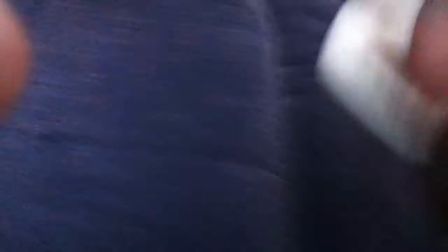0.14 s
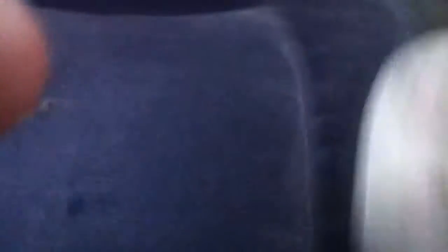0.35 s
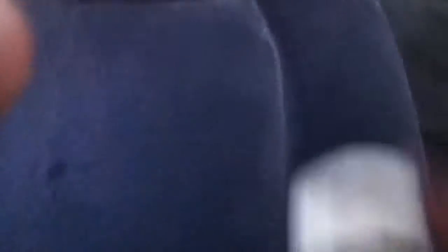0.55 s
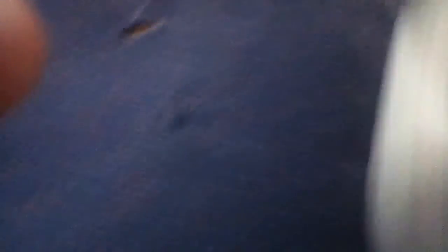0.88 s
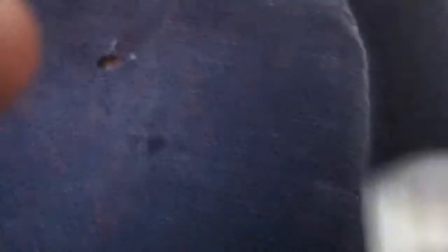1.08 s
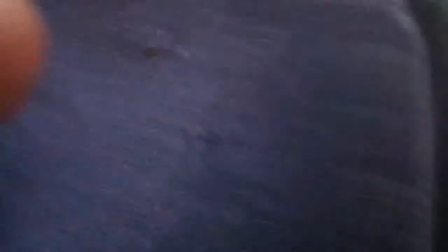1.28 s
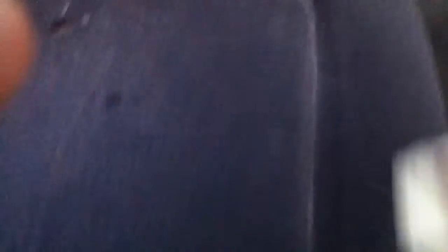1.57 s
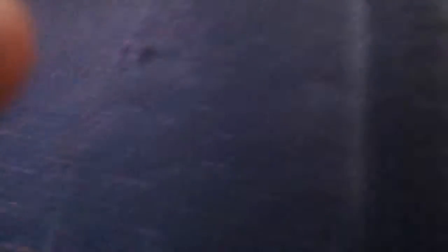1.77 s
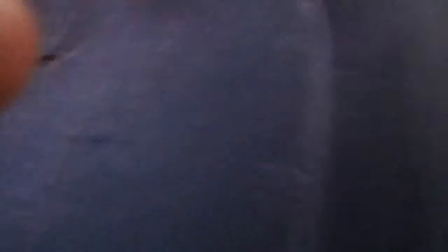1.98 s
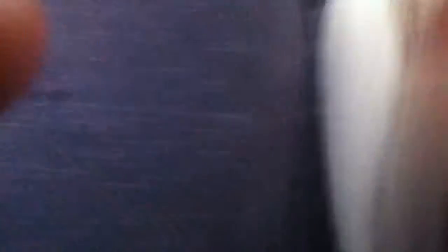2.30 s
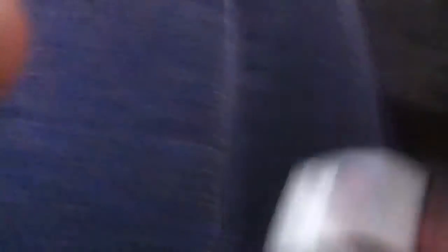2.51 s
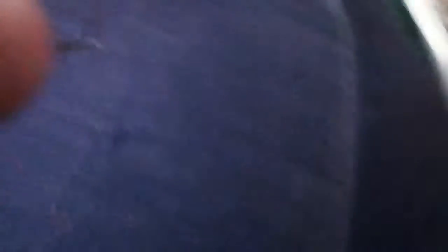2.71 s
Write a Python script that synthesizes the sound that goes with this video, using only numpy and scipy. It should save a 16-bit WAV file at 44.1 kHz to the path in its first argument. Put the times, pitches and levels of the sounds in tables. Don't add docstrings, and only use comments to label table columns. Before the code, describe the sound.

Rapid rhythmic scrubbing on a fabric seat, grainy and hissy with soft foam thumps, interrupted by two hard clicks; heard very close and dry, the level dipping after the first click, inside a quiet car.

```python
import sys
import numpy as np
from scipy import signal
from scipy.fft import rfft, irfft, next_fast_len
from scipy.io import wavfile
from scipy.ndimage import uniform_filter1d, map_coordinates

SR = 44100
rng = np.random.default_rng(int(sys.argv[2]) if len(sys.argv) > 2 else 0)


def volts_from_db(level):
    exponent = np.asarray(level, float) / 20
    return 10 ** exponent


def wrap_up_sound(samples):
    columns = np.atleast_2d(samples).T
    tamed = np.clip(columns, -1, 1)
    steps = np.round(tamed * 32767).astype(np.int16)
    wavfile.write(sys.argv[1], SR, steps)


N = 125685

# (start [s], length [s], rub level [dB], top weave pitch [Hz], hiss over the rub [dB])
STROKES = [(-.19, 0.23, -41, 1900, -13.5), (0.07, 0.25, -37, 2150, -15), (.365, 0.23, -41, 1797, -17.5),
           (0.615, 0.25, -37.5, 2094, -14), (0.891, 0.25, -39, 2140, -16.5),
           (1.151, .207, -36.5, 2145, -15), (1.41, .2, -41.5, 1900, -16.5),
           (1.641, 0.22, -37.5, 2158, -14.5), (1.895, .197, -39, 1990, -17.5),
           (2.125, 0.2, -37, 2137, -12.5), (2.367, 0.18, -36, 2350, -14), (2.571, 0.22, -36.5, 2290, -13),
           (2.823, 0.19, -40.5, 2000, -13)]
STROKE_LEAN = [3.5, 1, 3.5, 2.2, 5.5, 3, -1, 2.8, -6, 0.5, -0.5, 1, 4]
STROKE_SING = [-3, 0, -3, 0, -2, -.5, -5, -3, -5, 1, 0, 1.5, -3]
# (time [s], level [dB], half length [s])
DRAGS = [
    (0.349, -62, 0.04),
    (0.608, -70, .02),
    (1.385, -65, .03),
    (1.625, -52, .03),
    (2.125, -52.5, 0.028),
    (2.564, -48, 0.026),
]
# (multiple of the thread rate [1], level [dB], fuzz [Hz])
WEAVE_PARTIALS = [(.49, -3, 80), (.72, -9, 110), (1, .5, 85)]
# (frequency [Hz], level [dB])
WEAVE_COLOUR = [(300, -30), (600, -9), (900, -2), (2200, 0), (2700, -6)]
# (frequency [Hz], level [dB per Hz])
RUB_COLOUR = [(250, -29), (400, -5.5), (560, -8.5), (800, -5), (1700, -3.5), (2550, -10), (3000, -27),
              (5000, -44.5)]
FOAM_COLOUR = [(25, -56), (60, -29), (130, -14), (200, -3.5), (320, -7.5), (500, -22.5), (700, -48),
               (1100, -94)]
FIBRE_COLOUR = [(4500, -28), (6300, -10.5), (8000, -7.5), (9500, 0.5), (11500, -3.5), (13500, -5.5),
                (15600, -7)]
NAP_COLOUR = [(1800, -33), (2700, -4.5), (3300, -1), (4100, -7.5), (4600, -7.5), (5300, -9), (6300, -20.5),
              (8000, -46)]
CABIN_COLOUR = [(25, -53), (70, -13), (230, 6), (500, -8.5), (1000, -6), (2030, -14.5), (3200, -25.5),
                (15800, -30.5)]
# (frequency [Hz], width [Hz], lift [dB])
PAD_BODY = [(237, 38, 2.5), (725, 174, 6), (854, 124, 6), (985, 45, 9), (1432, 134, 3.5), (2540, 110, 2.5)]
# (time [s], peak level [dB], polarity and size of the blow [1], blow after the tick [ms])
SNAPS = [
    (1.4291, -2.5, 0.94, 0.17),
    (1.9339, -1.5, -1.46, 0.09),
]
# (frequency [Hz], level [dB], t60 [s])
TICK_MODES = [
    [(5730, -4.5, 0.0017), (6800, -4, .0014), (10800, -15.5, .0012)],
    [(4900, 0.5, 0.0011), (7700, -1.5, 0.00099), (9850, -9.5, 0.0013)],
]
# (frequency [Hz], level [dB], t60 [s])
BLOW_MODES = [
    [(367, -18.5, 0.046), (884, -20, 0.045), (1130, -0.5, 0.0077), (1900, -3.5, 0.0048),
     (2760, -7.5, 0.0045), (3700, -32, 0.001)],
    [(230, -29, 0.038), (480, -28.5, .02), (900, -5.5, 0.0059), (2350, -1, 0.0045), (3150, -1, 0.0023)],
]
# (time [s], peak level [dB], frequency [Hz])
KNOCKS = [
    (0.3681, -32.5, 790),
    (1.532, -23.5, 896),
]
DUCKS = [
    -8,
    -2.5,
]
# (frequency [Hz], width [Hz], level [dB])
PORT_DIPS = [(4470, 153, -5), (6370, 280, -6)]

PUSH_LEAN, PULL_LEAN = 1.1, .93
GRIP_SPEED = 0.23
RUB_GROWS, THUMP_GROWS, HISS_GROWS, WEAVE_GROWS = 0.57, 0.28, 0.81, 0.54
THUMP_DB, WEAVE_DB, NAP_DB = -13, -6.5, -18
WEAVE_TILT_DB, HISS_TILT_DB, NAP_TILT_DB = 3, 0.5, 10.5
SNAP_ATTACK_S, KNOCK_T60_S = .00006, 0.013
EDGE_LOW_HZ, EDGE_TOP_HZ = 180, 13600
SEAT_T60_S, SEAT_DB, CABIN_DB = 0.042, -22, -53
MIC_TOP_HZ, RECOVER_S = 15600, 1.8


def unit(x):
    return x / np.sqrt(np.mean(np.abs(x) ** 2) + 1e-20)


def wobble(rate):
    knots = rng.standard_normal(int(N * rate / SR) + 4)
    return map_coordinates(knots, [np.arange(N) * rate / SR])


def resonances(f, peaks):
    return sum(db / (1 + (2 * (f - centre) / width) ** 2) for centre, width, db in peaks)


def coloured(x, points, lifts=()):
    size = next_fast_len(N + 8192)
    f = np.fft.rfftfreq(size, 1 / SR)
    hz, level_db = np.transpose(points)
    curve_db = np.interp(np.log(f + 1), np.log(hz + 1), level_db) + resonances(f, lifts)
    return unit(irfft(rfft(x, size) * volts_from_db(curve_db), size)[:N])


def grit(spread_db, patchy_db):
    slips = rng.standard_normal(N) * volts_from_db(spread_db * rng.standard_normal(N))
    grid = signal.stft(slips, nperseg=512)[2]
    patches = uniform_filter1d(rng.standard_normal(grid.shape), size=2, axis=0)
    patches = uniform_filter1d(patches, size=6, axis=1)
    return signal.istft(grid * volts_from_db(patchy_db * unit(patches)), nperseg=512)[1][:N]


def scrubbing():
    speed, near, rub_db, top_hz, hiss_db, lean_db, sing_db = motion()
    slide = np.tanh((speed / GRIP_SPEED) ** 2)
    press_db = 1.5 * wobble(14) + 1.35 * wobble(44.85)
    cloth = coloured(grit(spread_db=4.5, patchy_db=2.5), RUB_COLOUR, PAD_BODY)
    fibres = coloured(grit(spread_db=2.5, patchy_db=2.0), FIBRE_COLOUR)
    nap = coloured(grit(spread_db=0.0, patchy_db=2.0), NAP_COLOUR)
    thump = foam_thump(speed, lean_db)
    threads_db = WEAVE_DB + sing_db + WEAVE_TILT_DB * near
    threads = volts_from_db(threads_db) * speed ** WEAVE_GROWS * weave(top_hz * speed)
    fibres_db = hiss_db + HISS_TILT_DB * near + 0.44 * wobble(29.8)
    nap_db = NAP_DB + NAP_TILT_DB * near + 1.24 * wobble(14)
    fine = volts_from_db(fibres_db) * fibres + volts_from_db(nap_db) * nap
    stroke = speed ** RUB_GROWS * cloth + thump + speed ** HISS_GROWS * fine + threads
    dragged = cloth + volts_from_db(-10) * fibres + volts_from_db(-15.5) * nap
    return volts_from_db(rub_db + press_db) * slide * stroke + turn_drag() * dragged


def motion():
    t, table = np.arange(N) / SR, np.array(STROKES)
    k = np.clip(np.searchsorted(table[:, 0], t) - 1, 0, None)
    start, length, rub_db, top_hz, hiss_db = table[k].T
    push = k % 2 == 1
    travel = np.clip((t - start) / length, 0, 1) ** np.where(push, PUSH_LEAN, PULL_LEAN)
    speed = np.abs(np.sin(np.pi * travel))
    near = np.where(push, .5 - travel, travel - .5)
    return speed, near, rub_db, top_hz, hiss_db, np.array(STROKE_LEAN)[k], np.array(STROKE_SING)[k]


def weave(thread_hz):
    turns = np.cumsum(thread_hz * (1 + .02 * wobble(30))) / SR
    song = 0
    for multiple, db, fuzz_hz in WEAVE_PARTIALS:
        phase = 2 * np.pi * multiple * turns
        fuzzy = wobble(fuzz_hz) * np.cos(phase) + wobble(fuzz_hz) * np.sin(phase)
        song = song + volts_from_db(db + 2.6 * wobble(40)) * fuzzy
    return coloured(song, WEAVE_COLOUR, PAD_BODY)


def foam_thump(speed, lean_db):
    lumps_db = 2.5 * wobble(35)
    foam = coloured(grit(spread_db=3, patchy_db=-0.5), FOAM_COLOUR, PAD_BODY)
    return volts_from_db(THUMP_DB + lean_db + lumps_db) * speed ** THUMP_GROWS * foam


def turn_drag():
    t = np.arange(N) / SR
    return sum(volts_from_db(db) * np.exp(-((t - s) / half) ** 2) for s, db, half in DRAGS)


def snaps():
    hits = 0
    for (s, db, sign, late_ms), tick, blow in zip(SNAPS, TICK_MODES, BLOW_MODES):
        hits = hits + volts_from_db(db) * (ring(s, tick) + sign * ring(s + late_ms / 1000, blow))
    for s, db, hz in KNOCKS:
        hits = hits + ring(s, [(hz, db, KNOCK_T60_S)])
    edge = signal.butter(3, [EDGE_LOW_HZ, EDGE_TOP_HZ], "band", fs=SR, output="sos")
    return signal.sosfilt(edge, hits)


def ring(s, modes):
    t = np.clip(np.arange(N) / SR - s, 0, None)
    modes_sum = sum(volts_from_db(db - 60 * t / t60) * np.sin(2 * np.pi * hz * t) for hz, db, t60 in modes)
    return (1 - np.exp(-t / SNAP_ATTACK_S)) * modes_sum


def seat_answer(x):
    t = np.arange(SR // 4) / SR
    tail = uniform_filter1d(rng.standard_normal(len(t)), size=12) * volts_from_db(-60 * t / SEAT_T60_S)
    return signal.fftconvolve(x, tail / np.linalg.norm(tail))[:N]


def cabin_air():
    drift_db = 1.2 * wobble(8)
    return volts_from_db(CABIN_DB + drift_db) * coloured(grit(spread_db=2.4, patchy_db=2.0), CABIN_COLOUR)


def scene():
    near = scrubbing() + snaps()
    return (near + volts_from_db(SEAT_DB) * seat_answer(near) + cabin_air())[None]


def roll_off(x):
    return signal.sosfilt(signal.butter(12, 16520, fs=SR, output="sos"), x)


def record(dry):
    t, f = np.arange(N) / SR, np.fft.rfftfreq(N, 1 / SR)
    heard = irfft(rfft(dry) * volts_from_db(resonances(f, PORT_DIPS)) * (f < MIC_TOP_HZ), N)
    gain_db = 0
    for (s, *_), duck_db in zip(SNAPS, DUCKS):
        drop = np.clip((t - s - .002) / 0.0069, 0, 1)
        gain_db = gain_db + duck_db * drop * np.exp(-np.abs(t - s) / RECOVER_S)
    return roll_off(heard * volts_from_db(gain_db))


dry = scene()
out = record(dry)
wrap_up_sound(out)
```